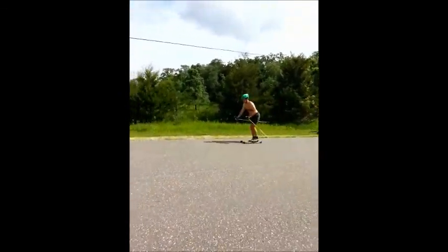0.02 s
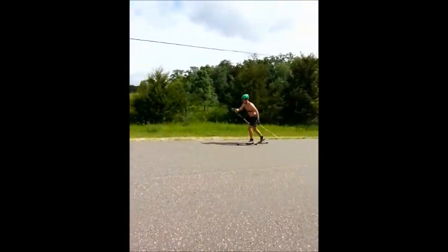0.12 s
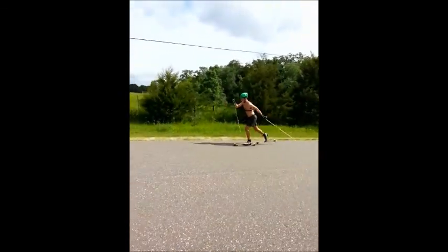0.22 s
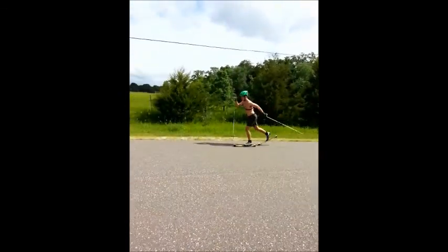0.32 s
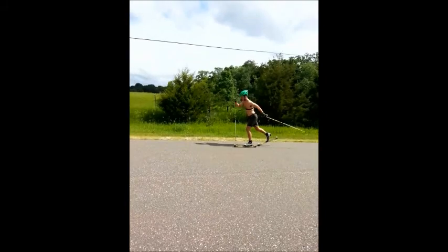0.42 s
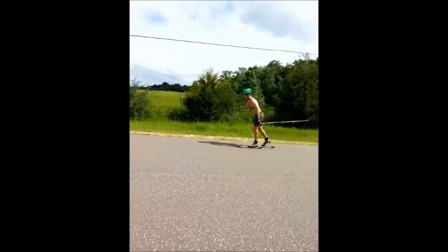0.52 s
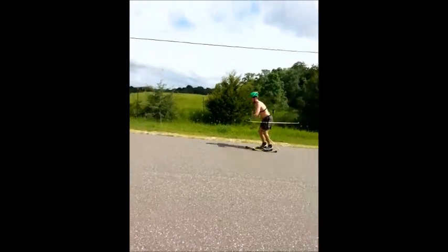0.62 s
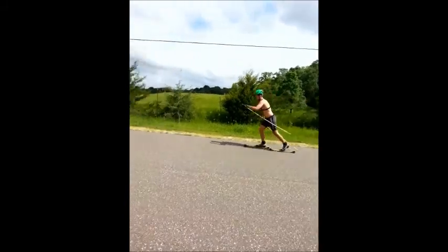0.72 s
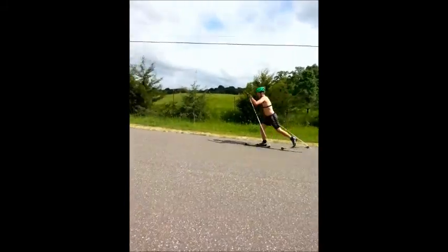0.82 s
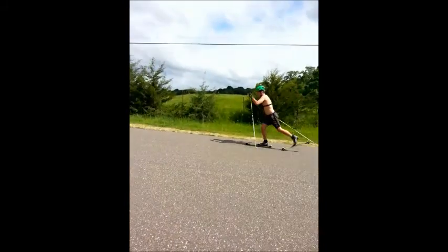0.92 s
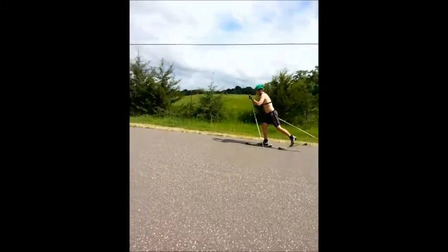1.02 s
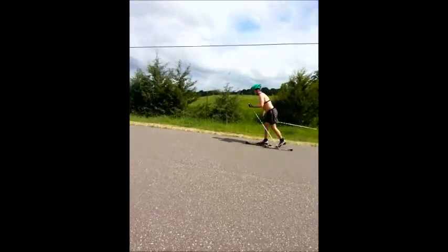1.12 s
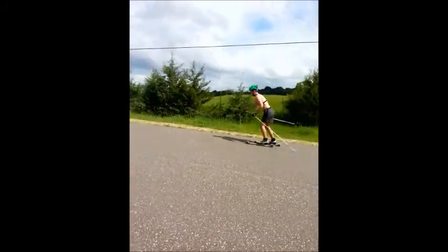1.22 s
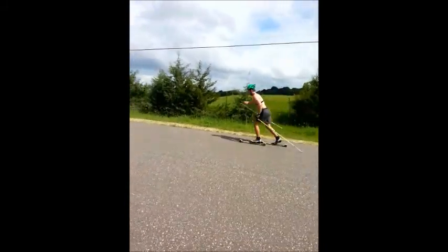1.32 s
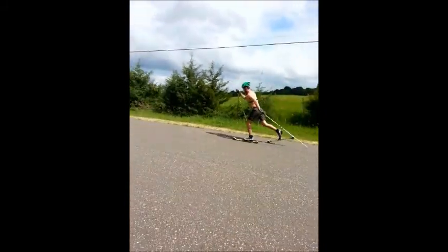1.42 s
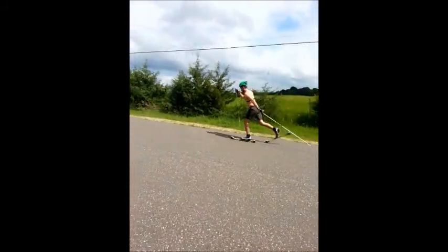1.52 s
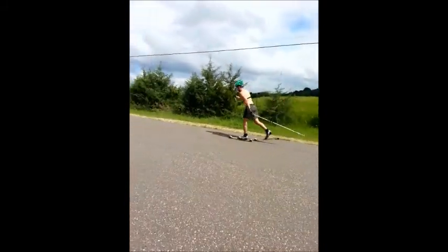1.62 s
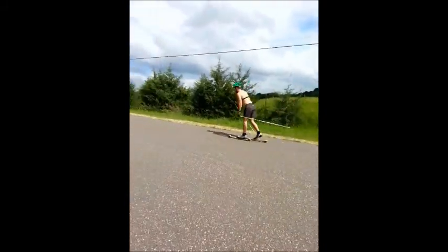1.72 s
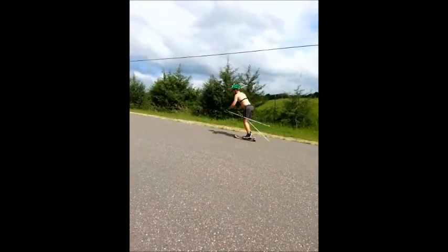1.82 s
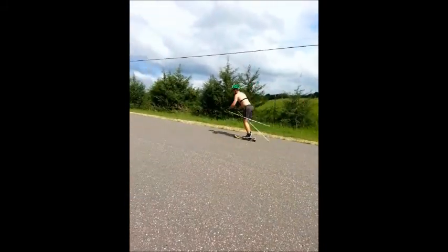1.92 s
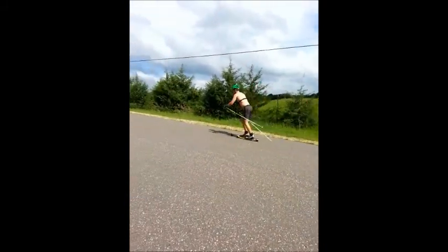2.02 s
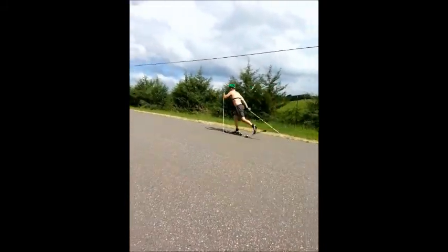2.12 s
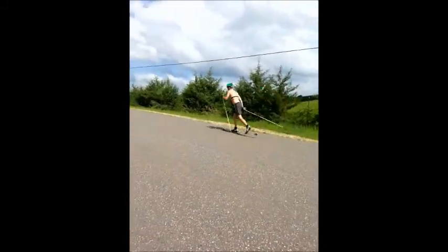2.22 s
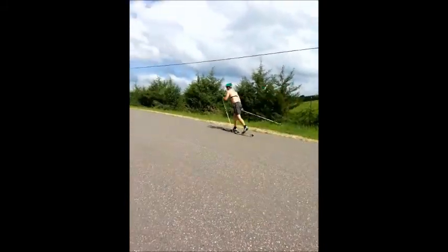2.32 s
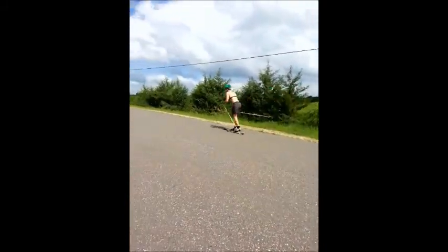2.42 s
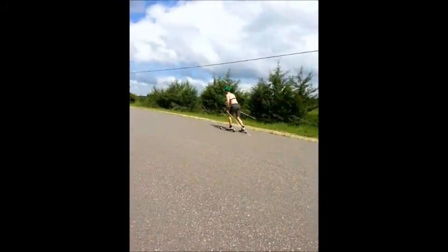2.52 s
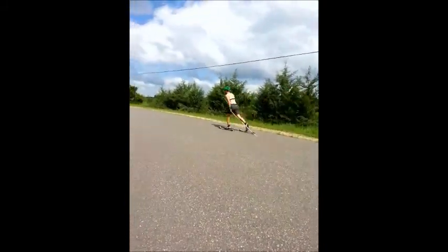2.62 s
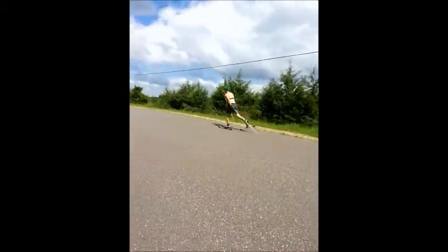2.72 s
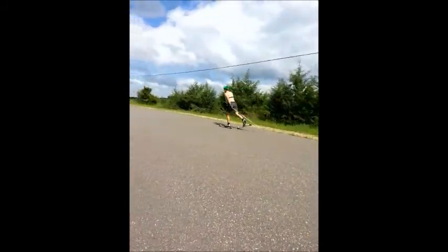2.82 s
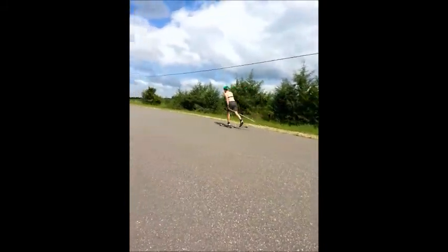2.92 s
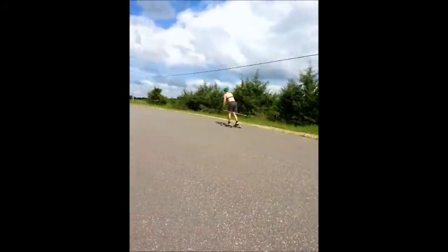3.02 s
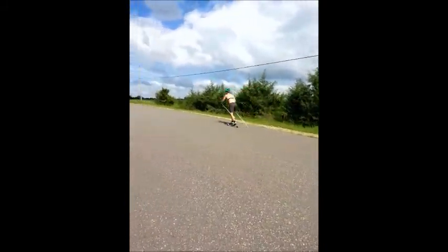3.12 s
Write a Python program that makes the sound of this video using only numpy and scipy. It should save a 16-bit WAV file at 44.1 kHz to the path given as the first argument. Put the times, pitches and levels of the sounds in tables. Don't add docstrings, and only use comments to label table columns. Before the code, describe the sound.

A roller skier passes on an open road: hard dry clicks, rapid ski clatter and faint rolling hiss, low wind buffets mid-way and later, high insect drone throughout, dry handheld microphone with no echo.

```python
import sys
import numpy as np
from scipy import signal
from scipy.fft import rfft, irfft, next_fast_len
from scipy.io import wavfile
from scipy.ndimage import uniform_filter1d, map_coordinates

SR = 44100
rng = np.random.default_rng(int(sys.argv[2]) if len(sys.argv) > 2 else 0)


def linear_from_db(decibels):
    return 10 ** (np.asarray(decibels, float) / 20)


def wrap_up_sound(samples):
    columns = np.atleast_2d(samples).T
    tamed = np.clip(columns, -1, 1)
    steps = np.round(tamed * 32767).astype(np.int16)
    wavfile.write(sys.argv[1], SR, steps)


N = 138915


def unit(x):
    return x / np.sqrt(np.mean(x ** 2) + 1e-20)


def curve(rows):
    time_s, value = np.transpose(rows)
    return np.interp(np.arange(N) / SR, time_s, value)


def wobble(rate):
    return map_coordinates(rng.standard_normal(1000), [np.arange(N) * rate / SR])


def filtered(x, response):
    size = next_fast_len(x.shape[-1] + 4096)
    spectrum = rfft(x, size) * response(np.fft.rfftfreq(size, 1 / SR))
    return irfft(spectrum, size)[..., :x.shape[-1]]


def modes(table):
    def response(f):
        total = 0
        for k, (hz, width, db) in enumerate(table):
            total = total + (-1) ** k * linear_from_db(db) * 1j * f * width / (hz * hz - f * f + 1j * f * width)
        return total
    return response


def rush(spectrum, patchy_db):
    z = signal.stft(rng.standard_normal(N), nperseg=512)[2]
    patches = uniform_filter1d(rng.standard_normal(z.shape), size=6, axis=0)
    patches = unit(uniform_filter1d(patches, size=10, axis=1))
    noise = signal.istft(z * linear_from_db(patchy_db * patches), nperseg=512)[1][:N]
    hz, db = np.transpose(spectrum)

    def colour(f):
        return linear_from_db(np.interp(np.log(f + 1), np.log(hz + 1), db, left=-120, right=-120))
    return unit(filtered(noise, colour))


def add(out, start_s, sound):
    part = out[round(start_s * SR):][:len(sound)]
    part += sound[:len(part)]


def inside(t, start_s, end_s, edge_s):
    return np.clip(np.minimum(t - start_s, end_s - t) / edge_s + 0.5, 0, 1)


# start_s, peak_db, low_modes_db, high_modes_db, ring_t60_s
PLANTS = [
    (0.7927, -7.5, -17, -12.5, 0.013),
    (1.1354, -26.5, 0.5, -26, 0.023),
    (1.4073, -15, -5, -5, 0.022),
    (1.5883, -49, 13, -12, 0.018),
    (1.6891, -17.5, -15.5, -10, 0.013),
    (2.0084, -9.5, -5.5, -2.5, 0.026),
    (2.379, -30.5, -1.5, -6, 0.016),
    (2.6436, -18.5, -2, 2, 0.033),
    (2.7847, -32, -1.5, -4, 0.015),
]
# start_s, peak_db
CHATTER_EARLY = [(0.123, -24.5), (0.1344, -20.5), (0.2463, -34), (0.3959, -23.5), (0.405, -13.5),
                 (0.4144, -20), (0.427, -30), (0.7466, -14.5), (0.7556, -10), (0.8909, -30), (0.9678, -21.5),
                 (0.9755, -11), (0.9863, -17.5), (1.0214, -16), (1.0317, -13), (1.3332, -19), (1.3434, -18),
                 (1.355, -36), (1.3662, -30)]
# start_s, peak_db
CHATTER_LATE = [(1.621, -18.5), (1.6296, -15.5), (1.641, -20), (1.6478, -18), (1.6591, -23), (1.959, -15),
                (1.9688, -9.5), (2.1776, -26), (2.1875, -7), (2.1972, -10), (2.572, -26), (2.582, -23),
                (2.668, -37), (2.8291, -17), (2.8394, -16), (2.8532, -29), (2.8625, -26.5), (2.8841, -24),
                (2.8963, -28)]
# start_s, peak_db
TOUCHES = [(0.7433, -23), (0.789, -13.5), (1.04, -18.5), (1.617, -31), (1.954, -28), (2.176, -18.5),
           (2.2085, -26)]
# from_s, low_modes_db, high_modes_db
STRIDES = [(0, -7.5, -2), (.3, -11.5, -3.5), (.7, -7.5, -3), (.9, -2.5, -4), (1.01, -10.5, -10.5),
           (1.3, -13.5, -4), (1.6, -10.5, -9.5), (1.9, -9, -3), (2.1, -9, -7.5), (2.5, -4.5, 2.5),
           (2.8, -11, -5), (2.845, -9, -24)]
# pitch_hz, width_hz, level_db
LOW_MODES = [(636, 170, -4), (1153, 104, 6), (1597, 114, -3)]
# pitch_hz, width_hz, level_db
MID_MODES = [(1847, 1030, -2), (2320, 480, 7), (2608, 343, 5.5), (3068, 190, 5), (3534, 504, -5)]
# pitch_hz, width_hz, level_db
HIGH_MODES = [(4214, 165, -1), (4996, 140, 5.5), (5360, 290, 6), (6790, 1600, 0.5)]
# pitch_hz, width_hz, level_db
AIR_MODES = [(9700, 1500, 12.5), (12340, 1230, 12), (11610, 260, 13.5), (15600, 2400, 8)]


def contacts():
    chatter_t60_s, rise_s, scrape_db, scrape_t60_s = 0.015, 0.00042, -28.5, 0.35
    air_db, air_fades_db_per_s = -3.5, 2.2
    out, t = np.zeros(N), np.arange(SR // 5) / SR
    rows = list(PLANTS)
    for start_s, db in list(CHATTER_EARLY) + list(CHATTER_LATE) + list(TOUCHES):
        _, low_db, high_db = [stride for stride in STRIDES if stride[0] < start_s][-1]
        rows.append((start_s, db, low_db, high_db, chatter_t60_s))
    for start_s, db, low_db, high_db, t60_s in rows:
        grit, lumps = rng.standard_normal((2, len(t)))
        grit = grit * linear_from_db(3.2 * unit(uniform_filter1d(lumps, size=9)))
        fall = linear_from_db(-60 * t / t60_s) + linear_from_db(scrape_db - 60 * t / scrape_t60_s)
        push = grit * (1 - np.exp(-t / rise_s)) * fall
        top_db = 0.78 * high_db + air_db - air_fades_db_per_s * start_s
        groups = (LOW_MODES, low_db), (MID_MODES, 0), (HIGH_MODES, high_db), (AIR_MODES, top_db)
        for table, group_db in groups:
            ring = filtered(push, modes(table))
            add(out, start_s, linear_from_db(db + group_db) * ring / abs(ring).max())
    return filtered(out, lambda f: 1 - 0.39 * modes([(8300, 1130, 0)])(f))


# delay_s, level_db
CRACK_BLOWS = [
    (0, 1.5),
    (.0029, -13),
    (.0052, -22),
]
# pitch_hz, width_hz, level_db
CRACK_MODES = [(713, 126, -13.5), (1236, 65, -5.5), (1630, 91, -5.5), (2616, 110, 2), (3500, 310, 0),
               (4320, 250, -1), (5590, 200, 2), (6480, 290, -8.5), (6760, 250, -15), (7840, 740, -9.5),
               (8840, 510, -9.5), (12200, 650, -24), (14800, 2000, -28)]


def crack():
    start_s, peak_db, grit_db, hold_s, t60_s = 0.2042, 4, -17, 0.0013, 0.0074
    out, t = np.zeros(N), np.arange(SR // 5) / SR
    fall = linear_from_db(-60 * np.maximum(t - hold_s, 0) / t60_s) + linear_from_db(-32 - 60 * t / 0.19)
    push = linear_from_db(grit_db) * rng.standard_normal(len(t)) * fall
    for delay_s, db in CRACK_BLOWS:
        push[round(delay_s * SR)] += linear_from_db(db)
    ring = filtered(push, modes(CRACK_MODES))
    add(out, start_s, linear_from_db(peak_db) * ring / abs(ring).max())
    return out


# start_s, peak_db, pitch_hz, ring_t60_s
KNOCKS = [(0.4045, -9.5, 2500, 0.017), (0.7916, -7.5, 2625, .018), (0.7915, -11, 2256, 0.027),
          (0.7915, -16.5, 613, 0.023), (0.9787, -14.5, 1165, 0.018), (0.9768, -14, 2360, .026),
          (0.986, -15, 2250, .026), (1.0322, -17, 2410, 0.029), (1.4086, -26, 1250, 0.037),
          (1.4067, -22, 2900, 0.024), (2.0106, -8, 2780, 0.022), (2.0105, -17, 1505, .034),
          (2.0108, -13.5, 2220, 0.026), (2.187, -15, 2320, 0.024), (2.188, -16, 3060, 0.03),
          (2.188, -19, 1870, 0.059), (2.6443, -16.5, 1187, 0.034), (2.6447, -17, 3054, 0.024),
          (2.884, -33, 2640, 0.059), (2.862, -34, 3090, .035), (2.839, -16.5, 1930, 0.024)]


def knocks():
    out, t = np.zeros(N), np.arange(SR // 20) / SR
    for start_s, db, hz, t60_s in KNOCKS:
        swell = 1 - np.exp(-t / 0.00043)
        add(out, start_s, linear_from_db(db - 60 * t / t60_s) * swell * np.sin(2 * np.pi * hz * t))
    return out


# start_s, end_s, level_db, high_modes_db
DRAGS = [
    (0, 0.054, -42.5, -4.5),
    (0.374, 0.519, -44, -8.5),
    (0.772, 0.785, -33, -16),
    (1.96, 2.028, -37, -11),
    (2.212, 2.24, -39, -14),
    (2.658, 2.709, -47, 0.5),
    (2.848, 2.915, -40.5, -4),
]


def drags():
    t = np.arange(N) / SR
    grit = rng.standard_normal(N) * linear_from_db(4.5 * wobble(250))
    body = unit(filtered(grit, modes(LOW_MODES[1:] + MID_MODES)))
    fine = unit(filtered(grit, modes(HIGH_MODES + [(11400, 13000, -15.5)])))
    out = np.zeros(N)
    for start_s, end_s, db, high_db in DRAGS:
        out += linear_from_db(db) * inside(t, start_s, end_s, edge_s=0.023) * (body + linear_from_db(high_db) * fine)
    return out


# time_s, level_db
ROLL = [(0, -43), (.6, -43.5), (1.2, -45.5), (1.8, -44.5), (2.4, -46.5), (2.95, -48), (3.15, -51.5)]
# pitch_hz, level_db per Hz
ROAD = [(300, -24), (420, -9), (600, 2.5), (880, -8.5), (1150, -4), (2400, -2), (3200, -5), (4200, -11.5),
        (6000, -8.5)]
# pitch_hz, level_db per Hz
HISS = [(3500, -44), (4500, -1.5), (7000, -4.5), (8500, -10), (11000, -10.5), (15700, -12), (16200, -60)]


def wheels():
    hiss_db, hiss_follows = -58, 0.53
    roll_db = curve(ROLL)
    unsteady_db = 0.89 * wobble(7.19) + 1.47 * wobble(150)
    body = linear_from_db(roll_db + unsteady_db) * rush(ROAD, patchy_db=1.5)
    hiss_level_db = hiss_db + hiss_follows * (roll_db - roll_db.mean())
    return body + linear_from_db(hiss_level_db) * rush(HISS, patchy_db=0)


# start_s, peak_db
TICKS = [(0.662, -39), (0.6739, -23.5), (0.6987, -24), (0.72, -29), (0.771, -25), (0.779, -29),
         (0.826, -22.5), (0.856, -24.5), (0.8744, -24), (0.8894, -46), (0.929, -31), (0.9418, -29),
         (1.2436, -38), (1.8115, -32), (1.8545, -36), (1.8954, -26), (1.9215, -23.5), (1.9428, -23),
         (2.0036, -20), (2.046, -22), (2.1083, -27), (2.1303, -24.5), (2.1484, -39), (2.16, -30),
         (2.243, -30), (2.265, -26.5)]
# start_s, peak_db
LATE_TICKS = [(3.044, -37), (3.0865, -37), (3.1104, -26.5), (3.125, -37), (3.1356, -29.5)]
# start_s, peak_db
MORE_TICKS = [(.509, -39), (.542, -38), (.589, -36), (.63, -40), (.6854, -40), (1.7154, -41), (1.773, -37),
              (1.882, -36)]
# pitch_hz, width_hz, level_db
TICK_BODY = [(5800, 320, 0)]
# pitch_hz, width_hz, level_db
TICK_EDGE = [(6360, 620, 2), (8100, 6300, 0.5), (10500, 1500, -2), (12300, 1600, -13)]
# pitch_hz, width_hz, level_db
TICK_PIP = [(3070, 94, 0)]


def ticks():
    body_t60_s, edge_t60_s = 0.016, 0.015
    out, t = np.zeros(N), np.arange(SR // 20) / SR
    for start_s, db in list(TICKS) + list(LATE_TICKS) + list(MORE_TICKS):
        rasp = rng.standard_normal(len(t))
        soft = rasp * linear_from_db(-60 * t / body_t60_s)
        body = filtered(soft, modes(TICK_BODY))
        pip = filtered(soft, modes(TICK_PIP))
        edge = filtered(rasp * linear_from_db(-60 * t / edge_t60_s),
                        lambda f: modes(TICK_EDGE)(f) * modes([(8000, 7000, 0)])(f))
        for part, part_db in (body, 0), (edge, 3 - 4.5 * start_s), (pip, -14.5 + 2 * start_s):
            add(out, start_s, linear_from_db(db - 3.5 + part_db) * part / abs(part).max())
    return out


# start_s, end_s, level_db
GUSTS = [(0, 0.057, -51), (0.256, 0.402, -46), (0.393, .51, -42.5), (0.724, 0.875, -39.5),
         (1.134, 1.272, -42), (1.344, 1.492, -31), (1.494, 1.551, -33), (1.943, 2.134, -39.5),
         (2.165, 2.295, -32), (2.278, 2.426, -43.5), (2.412, 2.505, -38.5), (2.491, 2.704, -38),
         (2.694, 2.88, -37.5), (2.864, 2.993, -45.5), (3.123, 3.2, -42.5)]
# pitch_hz, level_db per Hz
RUMBLE = [(25, -48), (60, -1), (100, -2.5), (170, -4.5), (260, -7.5), (500, -45.5)]
# pitch_hz, level_db per Hz
FLUTTER = [(100, -9), (200, -4.5), (330, -0.5), (450, -11), (750, -17)]
# start_s, peak_db, pitch_hz
EDDIES = [(0.477, -31.5, 145), (0.799, -29, 88.8), (0.833, -27, 155), (1.33, -31.5, 156), (1.355, -18, 215),
          (1.378, -20, 171), (1.399, -25.5, 338), (1.42, -15, 146), (1.441, -22, 90), (1.466, -19, 205),
          (1.482, -26, 126), (1.501, -14.5, 133), (1.523, -16, 178), (2.175, -18, 274), (2.205, -12, 171),
          (2.224, -17, 278), (2.231, -7.5, 208), (2.252, -11, 148), (2.276, -25, 192), (2.505, -19.5, 115),
          (2.535, -31, 129), (2.567, -25, 105), (2.608, -16.5, 164), (2.627, -28, 169), (2.654, -20.5, 167),
          (2.713, -23, 106), (2.741, -20.5, 148), (2.759, -30, 77.5), (2.795, -25, 143), (2.82, -27.5, 79)]
# pitch_hz, level_db per Hz
FAR = [(30, 1), (60, 2.5), (200, -1.5), (500, -11), (800, -10)]


def wind():
    t = np.arange(N) / SR
    gust = np.zeros(N)
    for start_s, end_s, db in GUSTS:
        gust += linear_from_db(db) * inside(t, start_s, end_s, edge_s=0.03) ** 2
    out = gust * unit(linear_from_db(1.9 * wobble(30.29)) * rush(RUMBLE, patchy_db=0))
    flutter = unit(linear_from_db(3 * wobble(50)) * rush(FLUTTER, patchy_db=2.5))
    out += gust * (gust / linear_from_db(-27.5)) ** 0.64 * flutter
    t = t[:SR // 20]
    sag, cycles = 0.14, 0.61
    for start_s, db, hz in EDDIES:
        turn = 2 * np.pi * np.log1p(sag * 1.125 * hz * t) / sag
        swirl = np.sin(turn) + linear_from_db(-11) * np.sin(2 * turn)
        add(out, start_s, linear_from_db(db) * swirl * np.exp(-(t * hz / cycles - 1.3) ** 2))
    return out + linear_from_db(-49) * rush(FAR, patchy_db=1.5)


# pitch_hz, width_hz, level_db
DRONE = [(5350, 220, -5), (5750, 470, 0)]


def chorus():
    out = np.zeros(N)
    for hz, width, db in DRONE:
        band = unit(filtered(rng.standard_normal(N), lambda f: modes([(hz, width, 0)])(f) ** 2))
        out += linear_from_db(-55 + db + wobble(8.58) + 4.24 * wobble(70)) * band
    return out


def scene():
    skier = contacts() + crack() + knocks() + drags() + wheels()
    return (skier + ticks() + wind() + chorus())[None]


def roll_off(x):
    return signal.sosfilt(signal.butter(12, 16750, fs=SR, output="sos"), x)


def record(dry):
    low_cut_hz, top_hz = 42, 15900
    heard = filtered(dry, lambda f: (1j * f / (low_cut_hz + 1j * f)) ** 2 / (1 + (f / top_hz) ** 300))
    mix = heard / (1 + abs(heard) ** 8) ** (1 / 8)
    return roll_off(mix)


dry = scene()
out = record(dry)
wrap_up_sound(out)
```